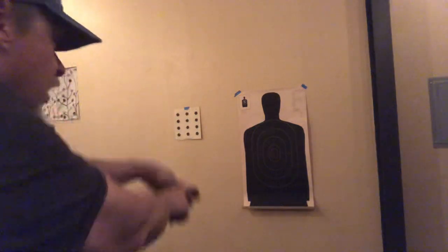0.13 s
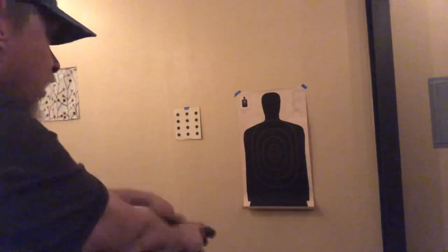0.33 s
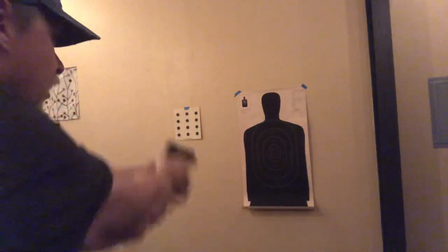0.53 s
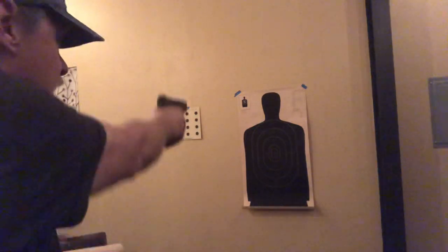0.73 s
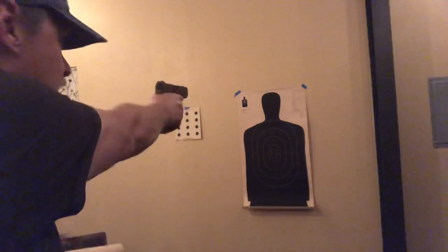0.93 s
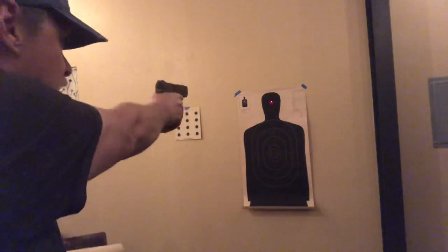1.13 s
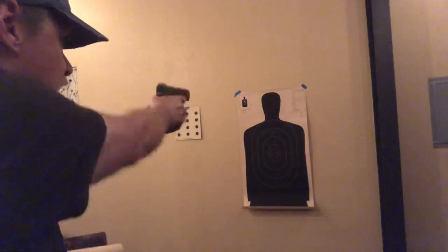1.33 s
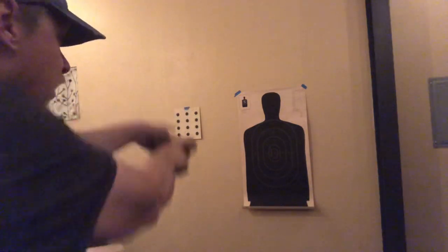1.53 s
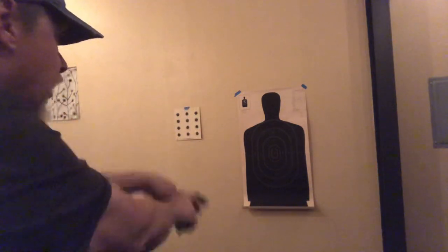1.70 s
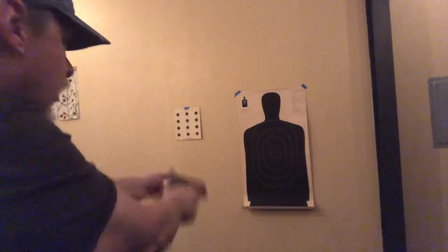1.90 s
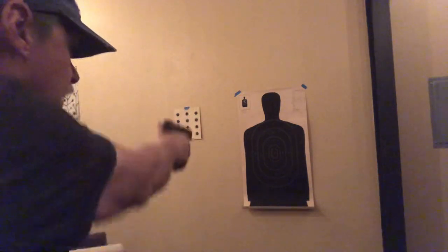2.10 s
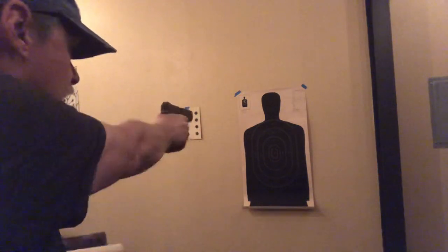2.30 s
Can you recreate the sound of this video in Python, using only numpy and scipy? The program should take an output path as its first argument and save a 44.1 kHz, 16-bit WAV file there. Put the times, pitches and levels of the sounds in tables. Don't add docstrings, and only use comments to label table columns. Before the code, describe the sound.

Pistol slide racked by hand, loud metallic slam, dry trigger click, then racked again indoors

```python
import sys
import numpy as np
from scipy import signal
from scipy.fft import rfft, irfft
from scipy.io import wavfile
from scipy.ndimage import uniform_filter1d

SR = 44100
rng = np.random.default_rng(int(sys.argv[2]) if len(sys.argv) > 2 else 0)


def log_audio(samples):
    frames = np.atleast_2d(samples).T
    limited = np.clip(frames, -1, 1)
    pcm = np.round(limited * 32767).astype(np.int16)
    wavfile.write(sys.argv[1], SR, pcm)


def volts_from_db(level):
    exponent = np.asarray(level, float) / 20
    return 10 ** exponent


N = 103635

# frequency in Hz, t60 in seconds,
# level in dB at the first slam, level in dB at the second slam, level in dB while pulled.
SLIDE = [(1200, 0.072, 6, -0.5, -4), (1280, 0.078, -3, -15, -6.5), (1983, 0.059, 0, 2, -11.5),
         (2780, 0.04, -22.5, -3.5, 4.5), (3480, 0.029, -5, -2.5, -4.5), (4200, 0.012, -1, -15.5, 5.5),
         (4753, 0.15, -7, 2.5, -7.5), (5177, 0.037, -7, 4.5, -15.5), (6155, 0.034, -9, 2, 5),
         (6680, 0.037, -0.5, 9, -4.5), (8090, .015, 6.5, -12.5, -6), (8560, 0.044, 0, -8, -20),
         (10480, .07, 6, -1.5, -10), (16000, .06, -16, -15, -30)]


def band(x, hz, q):
    b, a = signal.iirpeak(np.clip(hz, 50, .45 * SR), max(q, .6), fs=SR)
    return signal.lfilter(b, a, x)


def unit(x):
    return x / np.sqrt(np.mean(x ** 2))


def unit_energy(x):
    return x / np.sqrt(np.sum(x ** 2))


def rattle(shape):
    spectrum = rfft(rng.standard_normal(len(shape)) * shape)
    smooth_power = uniform_filter1d(np.abs(spectrum) ** 2, size=len(shape) // 100)
    even = irfft(spectrum / np.sqrt(smooth_power), len(shape))
    return unit_energy(even * np.sqrt(shape))


def ringing(modes):
    t = np.arange(SR // 4) / SR
    hz, t60, db = (column[:, None] for column in np.array(modes, float).T)
    split = rng.uniform(0.0017, 0.011, (len(hz), 1)) * np.array([-1, 1])[:, None, None]
    pair = np.sin(2 * np.pi * hz * (1 + split) * t).sum(axis=0)
    pair = pair * (-1) ** np.arange(len(hz))[:, None]
    decay = np.exp(-np.log(1000) * t / t60) / np.sqrt(t60)
    return unit_energy((volts_from_db(db) * pair * decay).sum(axis=0))


def contacts(rows, modes):
    crack_q, crack_wide_db = 0.8, -15
    thump_hz, thump_db = 581, -26
    out = np.zeros(N + SR)
    ring = ringing(modes)
    t = np.arange(1024) / SR
    for start_s, db, contact_ms, hz, ring_db in rows:
        envelope = (1 - np.exp(-t / 0.0001)) * np.exp(-(t * 1000 / contact_ms) ** 2)
        push = rattle(envelope) * np.sqrt(SR * contact_ms / 1000)
        crack = band(push, hz, crack_q) * np.sqrt(SR / 4 / hz)
        crack = crack + volts_from_db(crack_wide_db) * np.diff(push, prepend=0)
        knock = volts_from_db(thump_db) * band(np.abs(push), thump_hz, 2.5)
        drive = band(push, hz, 0.88) * np.sqrt(SR / 8 / hz)
        sound = volts_from_db(ring_db) * signal.fftconvolve(drive, ring)
        sound[:len(t)] += crack + knock
        at = int(start_s * SR)
        out[at:at + len(sound)] += volts_from_db(db) * sound
    return out[:N]


def rails():
    # time in seconds, level in dB.
    rub_first = [(.165, -130), (.186, -47), (.205, -49.5), (.235, -48), (.262, -52), (.30, -60),
                 (.335, -45), (.356, -29), (.362, -130)]
    rub_second = [(1.59, -130), (1.612, -56), (1.635, -52), (1.655, -42.5), (1.675, -38), (1.70, -62.5),
                  (1.722, -51), (1.754, -49.5), (1.76, -130)]
    grains_per_s, scatter_db = 6000, 2
    rub_hz, rub_q, ring_db = 3200, 1, -12.5
    t = np.arange(N) / SR
    hits = rng.random(N) < grains_per_s / SR
    strength = volts_from_db(scatter_db * rng.exponential(size=N))
    grit = unit(hits * strength * rng.standard_normal(N))
    grit = grit * sum(volts_from_db(np.interp(t, *np.array(rub).T)) for rub in (rub_first, rub_second))
    ring = ringing([(hz, t60, db) for hz, t60, _, _, db in SLIDE])
    return 2 * band(grit, rub_hz, rub_q) + volts_from_db(ring_db) * signal.fftconvolve(grit, ring)[:N]


def squeak():
    end_s, hz, level_db, rise_s = 1.9, 8300, -54, 0.009
    t = np.arange(N) / SR - end_s
    swell = np.exp(np.minimum(t, 0) / rise_s) * (t < 0)
    return volts_from_db(level_db) * np.sin(2 * np.pi * hz * t) * swell


def room(delays_ms, echoes):
    # frequency in Hz, t60 in seconds, level in dB.
    tail_bands = [(400, .3, -7.5), (975, 0.8, -5.5), (1930, 0.63, 0.5), (4000, 0.74, -3.5),
                  (6500, 0.62, -1), (9000, 0.48, 1), (12000, 0.15, -1.5), (16000, .26, 5)]
    tail_db, tail_rise_s = -9, 0.009
    t = np.arange(SR) / SR
    out = np.zeros(SR)
    out[0] = 1
    for ms, (db, smear_ms) in zip(delays_ms, echoes):
        at = int(ms * SR / 1000)
        out[at:at + 1024] += volts_from_db(db) * rattle(np.exp(-t[:1024] * 1000 / smear_ms))
    band_hz, band_t60, band_db = np.array(tail_bands).T
    tail = 0
    for hz in 300 * 2 ** np.arange(0, 6, 1 / 3):
        t60 = np.interp(np.log(hz), np.log(band_hz), band_t60)
        db = np.interp(np.log(hz), np.log(band_hz), band_db)
        noise = band(band(rng.standard_normal(SR), hz, 2.7), hz, 2.7)
        tail = tail + volts_from_db(db) * noise * np.exp(-np.log(1000) * t / t60)
    tail = tail * (1 - np.exp(-(t / tail_rise_s) ** 3))
    return out + volts_from_db(tail_db) * unit_energy(tail)


def air():
    # frequency in Hz, level in dB per Hz.
    air_spectrum = [(15, -39), (25, -12), (120, -0.5), (363, -11.5), (476, -11.5), (2280, -21.5),
                    (3160, -23.5), (14800, -45.5), (16000, -43.5)]
    level_db, flicker_db = -58, 2.5
    hold = SR // 12
    table_hz, table_db = np.array(air_spectrum).T
    out = 0
    for hz in 28 * 2 ** np.arange(0, 9.3, 1 / 3):
        steps = np.repeat(rng.standard_normal(N // hold + 1), hold)
        flicker = uniform_filter1d(steps, hold)[:N]
        db = np.interp(np.log(hz), np.log(table_hz), table_db) + flicker_db * flicker
        out = out + volts_from_db(db) * band(band(rng.standard_normal(N), hz, 1.4), hz, 1.4)
    return volts_from_db(level_db) * unit(out)


def scene():
    # start in seconds, level in dB, contact in ms, centre in Hz, ring in dB.
    pull_first = [(.1875, -44.5, 5.7, 4400, -14.5), (.1962, -46, 0.66, 11090, -10.5),
                  (.2078, -29.5, 1.2, 6000, -28), (.2165, -28.5, 4, 4000, 0), (.2188, -27.5, 2, 1200, -10),
                  (.2265, -33, 0.94, 3467, -20), (.2295, -23, 1.5, 6990, -15.5),
                  (.2560, -42.5, 2, 3400, -10), (.2693, -19.5, 1.4, 1422, -24.5),
                  (.2712, -26.5, 2, 4200, -12), (.3460, -34, 3.6, 4450, 3)]
    pull_second = [(1.6063, -41, 2, 6000, -5), (1.6225, -36, 5.4, 4000, -7),
                   (1.6247, -44, 2.4, 7500, -15.5), (1.6412, -44.5, 2.8, 8000, 4.5),
                   (1.646, -24, 1.6, 3520, -3), (1.6587, -22.5, 0.76, 9000, -6.5),
                   (1.6596, -31.5, 0.67, 5000, -10.5), (1.6920, -46, 4, 3500, -20),
                   (1.7446, -33, 3, 4000, 3)]
    slam_first = [
        (.3568, -20.5, 2.7, 7000, -6),
        (.3603, -7, 2.87, 6500, -3.5),
        (.3650, -15.5, 4, 4000, -20.5),
    ]
    slam_second = [
        (1.7555, -18.5, 1.2, 9000, -15),
        (1.7600, -7.5, 1.83, 6500, 0),
    ]
    striker = [
        (1.0975, -46.5, 3, 1503, -3.5),
        (1.1013, -16, 2.9, 4200, -7),
        (1.1053, -17, 1.2, 8000, -6),
    ]
    ticks = [(.0650, -60, 3, 13000, -4.5), (.7038, -59.5, 2, 9000, -4), (1.0785, -58, 2, 9000, -4.5),
             (1.2530, -41, 2, 4000, -2.5), (1.4022, -53.5, 2, 3440, -9), (1.4885, -60, 3, 5500, -2),
             (2.2154, -48.5, 1.5, 7500, -3.5), (2.2300, -59.5, 2, 6000, -4.5)]
    # frequency in Hz, t60 in seconds, level in dB.
    frame_modes = [(1130, 0.041, -10), (2060, 0.016, -14), (2940, .015, -5.5), (3116, 0.0072, -0.5),
                   (4200, 0.0094, 8), (5320, 0.017, -16), (6600, .015, -5), (7050, .025, 1),
                   (7980, 0.037, 0.5), (8500, 0.018, -24.5), (9900, 0.0167, -10.5), (11470, .008, 4),
                   (13800, .008, -10.5)]
    low_ms = [9, 12.6, 14.5, 17, 22.5, 38]
    aimed_ms = [8.5, 11.2, 15, 19, 22.5, 36]
    # level in dB, smear in ms.
    low_echoes = [(-14.5, 0.93), (-13, 0.69), (-10.5, 2.8), (-14, 4.1), (-19, 1.6), (-17, 4.9)]
    aimed_echoes = [(-14, .3), (-2.5, 0.64), (-12, 1.5), (-20, 1.57), (-18, 0.44), (-18, 4.4)]

    def slide_modes(column):
        return [(mode[0], mode[1], mode[column]) for mode in SLIDE]

    low = contacts([*pull_first, *pull_second], slide_modes(4)) + rails()
    low = low + contacts(slam_first, slide_modes(2)) + contacts(slam_second, slide_modes(3))
    aimed = contacts([*striker, *ticks], frame_modes) + squeak()
    heard = signal.fftconvolve(low, room(low_ms, low_echoes))
    heard = heard + signal.fftconvolve(aimed, room(aimed_ms, aimed_echoes))
    return (heard[:N] + air())[None]


def top_cut(x):
    return signal.sosfilt(signal.butter(12, 16980, fs=SR, output="sos"), x)


def record(dry):
    low_pass = signal.ellip(8, .2, 60, 16300, fs=SR, output="sos")
    mix = signal.sosfilt(low_pass, dry)
    return top_cut(mix)


dry = scene()
out = record(dry)
log_audio(out)
```